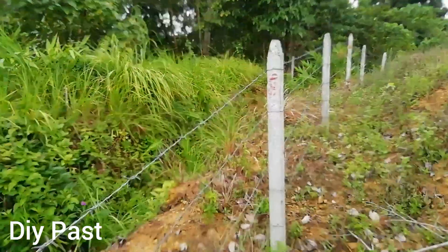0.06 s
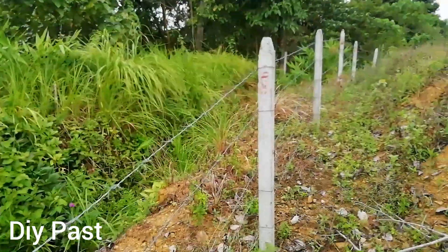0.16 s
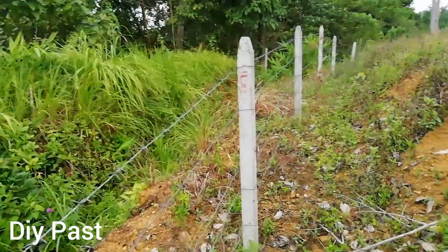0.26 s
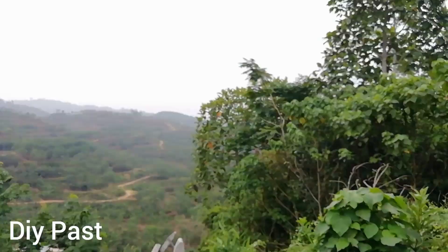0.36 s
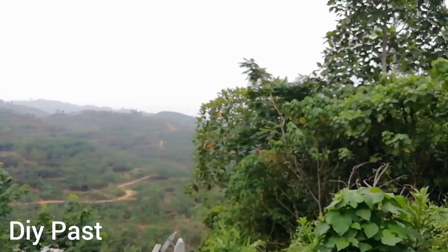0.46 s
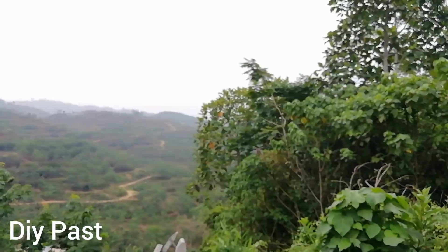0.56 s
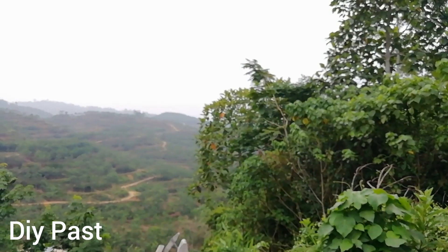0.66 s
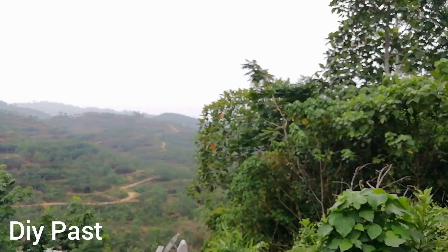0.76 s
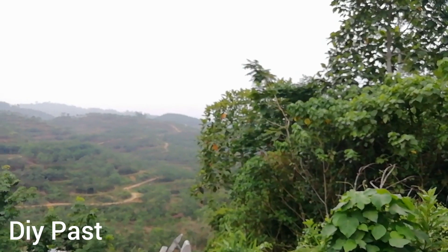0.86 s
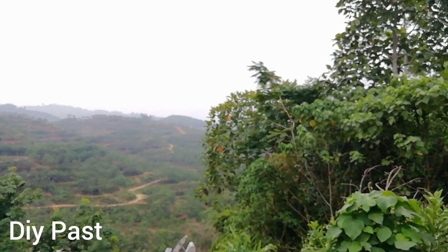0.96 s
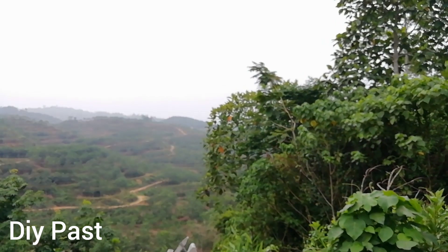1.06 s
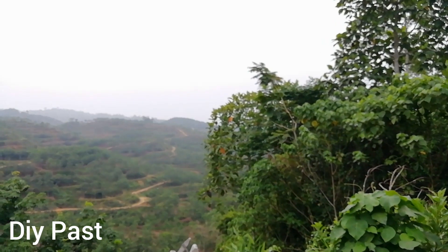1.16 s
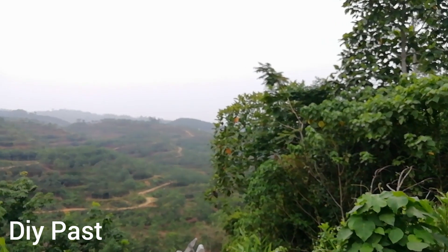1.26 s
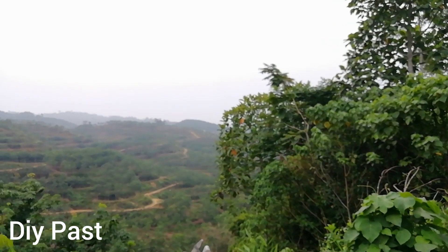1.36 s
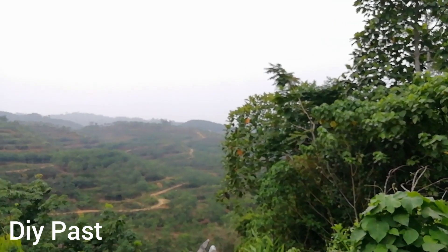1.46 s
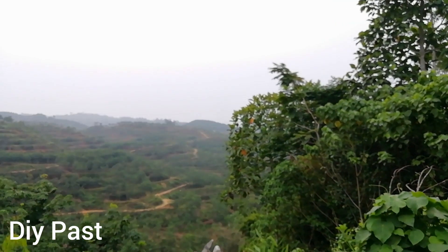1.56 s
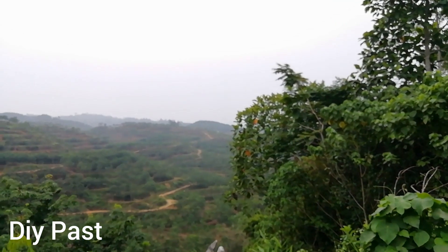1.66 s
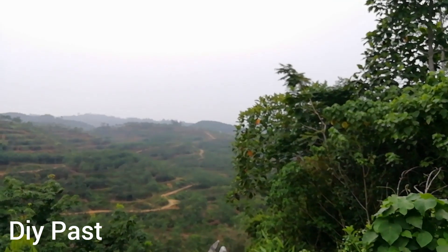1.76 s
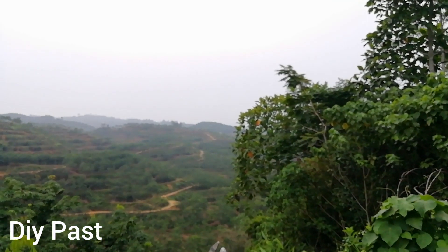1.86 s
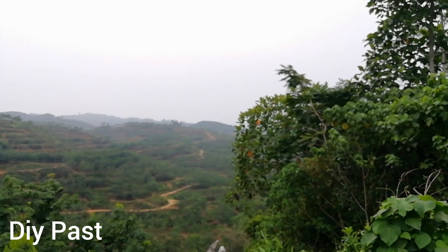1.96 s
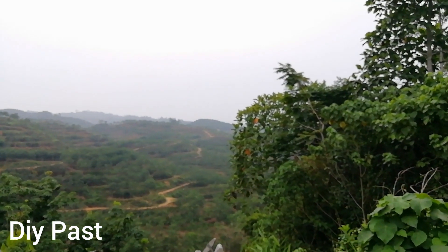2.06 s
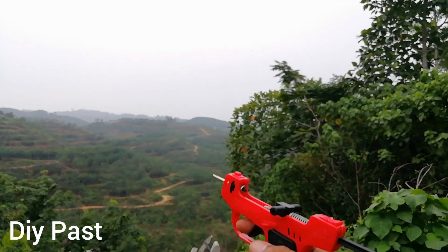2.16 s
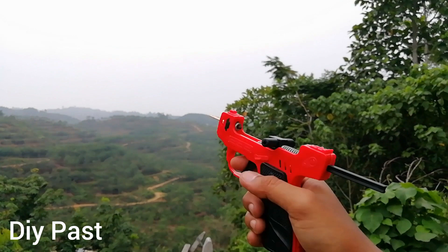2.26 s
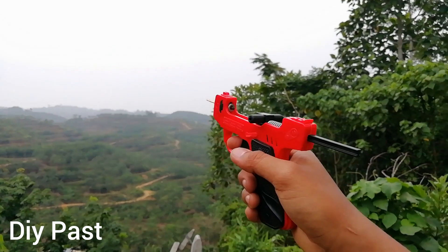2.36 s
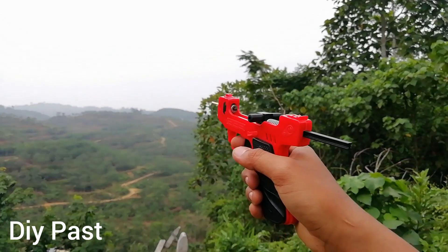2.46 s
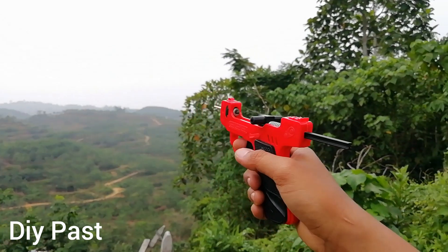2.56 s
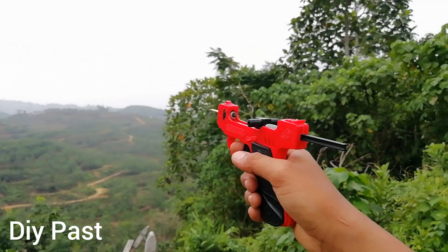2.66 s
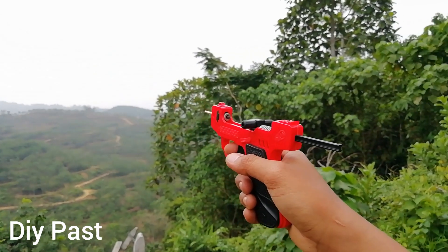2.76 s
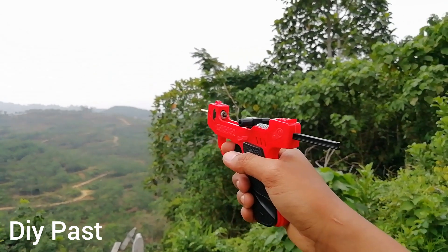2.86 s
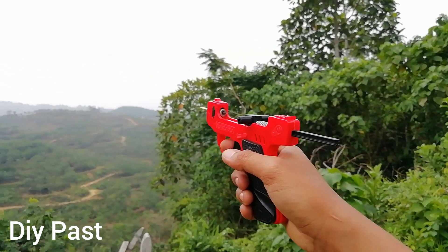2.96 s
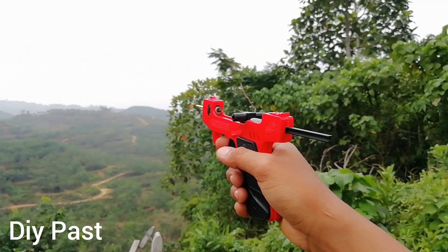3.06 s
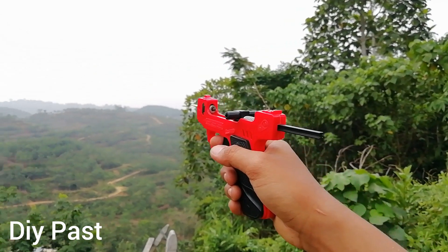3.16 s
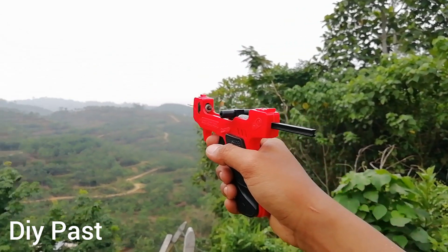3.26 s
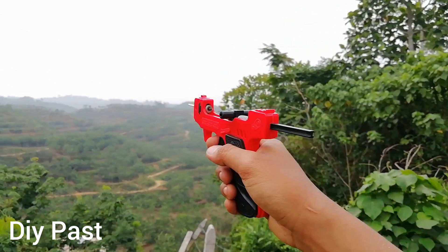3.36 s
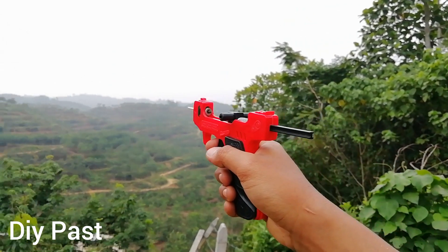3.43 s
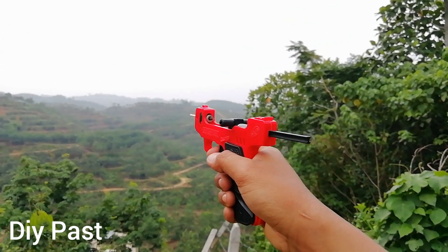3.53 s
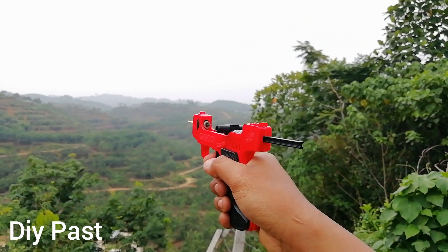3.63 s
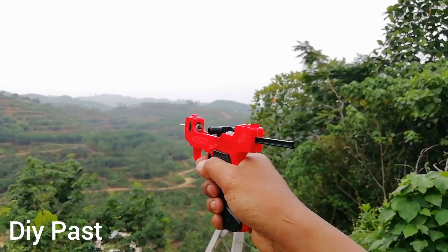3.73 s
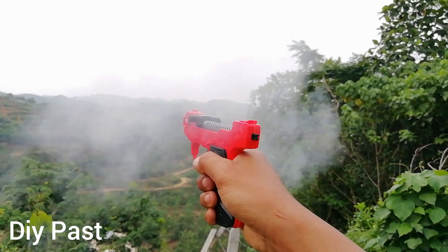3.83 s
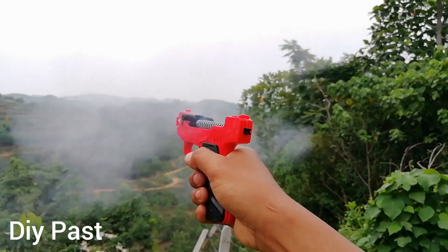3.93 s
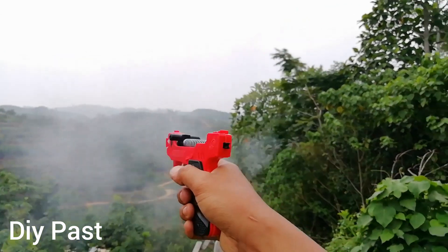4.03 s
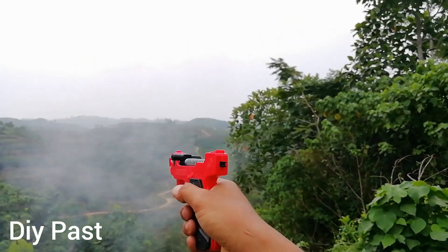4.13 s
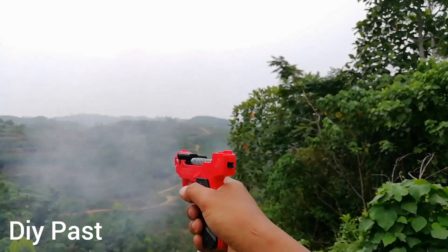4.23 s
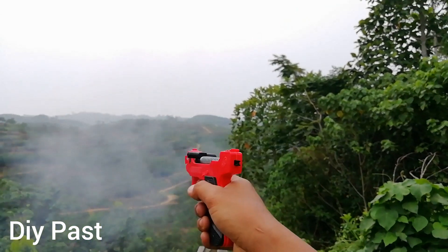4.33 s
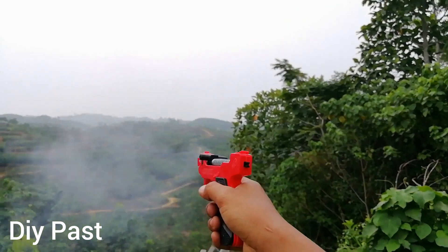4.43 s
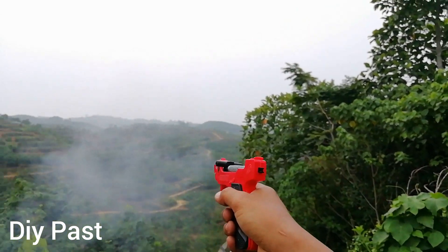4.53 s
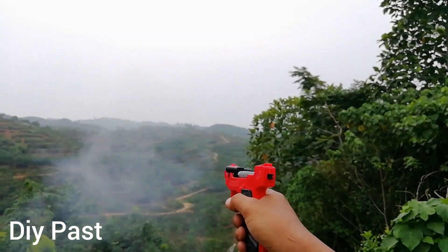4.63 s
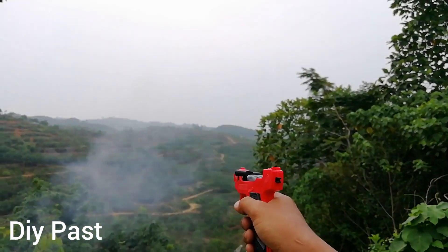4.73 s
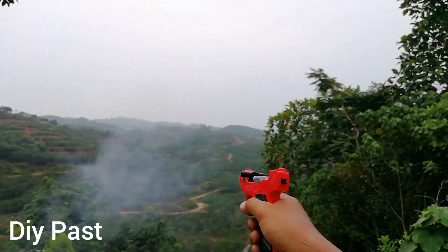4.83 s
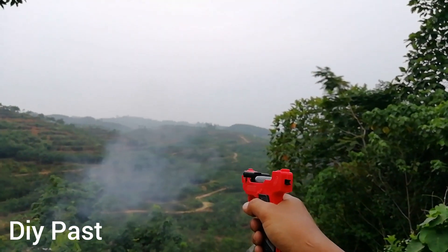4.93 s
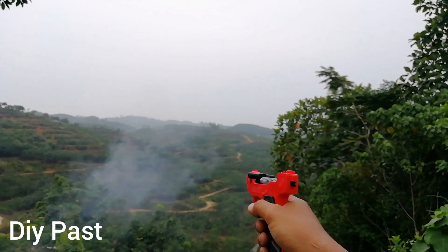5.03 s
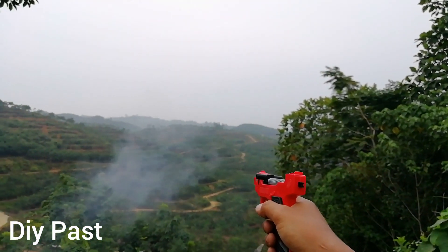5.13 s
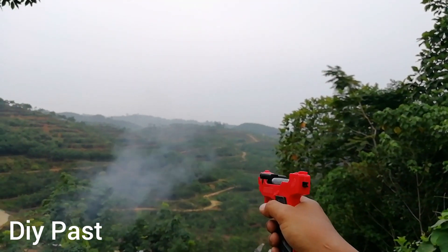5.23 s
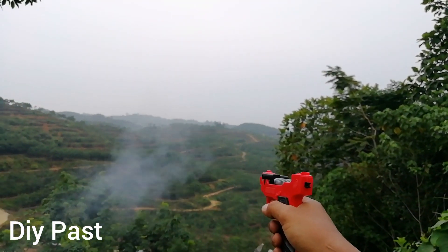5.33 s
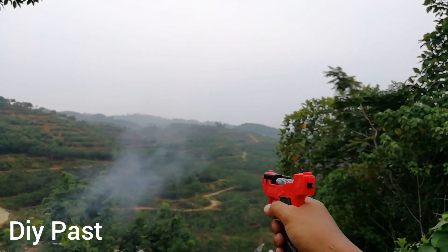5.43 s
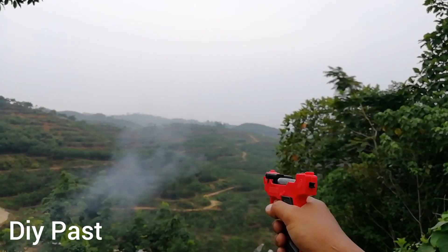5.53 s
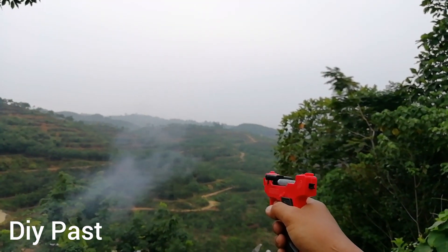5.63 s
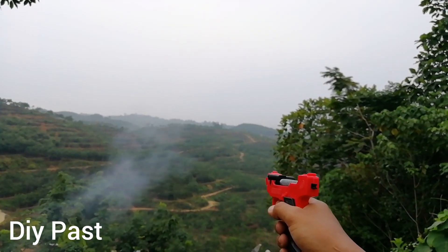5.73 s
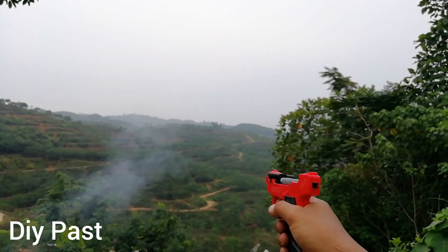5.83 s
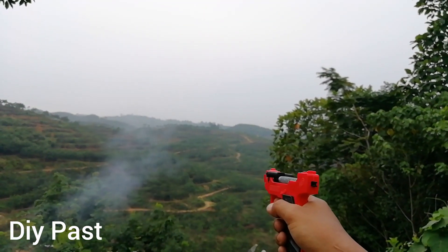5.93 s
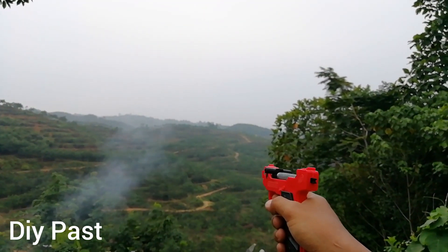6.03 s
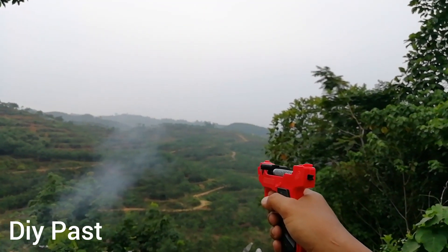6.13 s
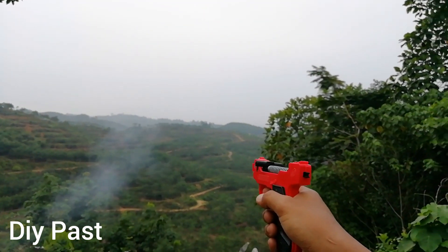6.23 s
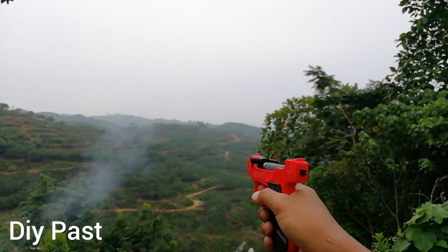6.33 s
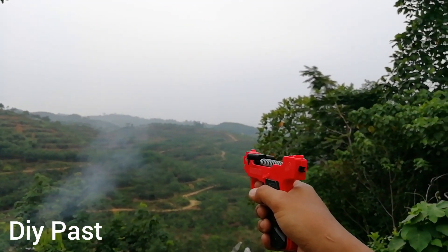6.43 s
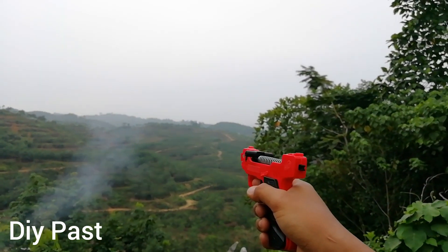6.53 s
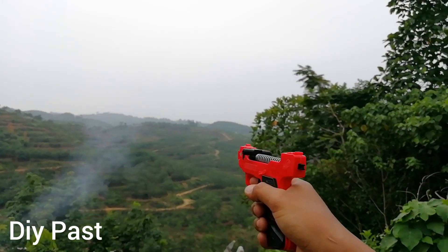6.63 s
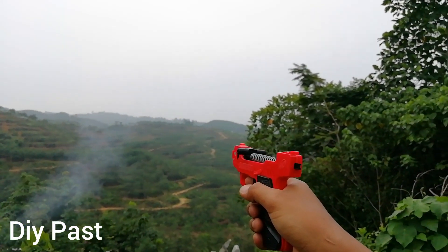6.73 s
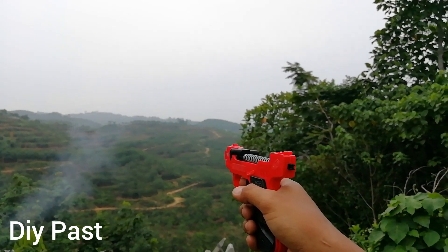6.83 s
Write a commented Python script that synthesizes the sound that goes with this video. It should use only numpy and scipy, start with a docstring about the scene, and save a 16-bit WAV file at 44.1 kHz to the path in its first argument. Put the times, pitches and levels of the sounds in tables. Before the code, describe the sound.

Quiet green hillside above a valley, heard from a handheld stereo microphone. First a short rustling step with snapping twigs, then a steady pulsed cicada, mostly to the right, with regular bird chips and sweet sliding whistles. A single hard crack from a small toy gun distorts the microphone, then scatters off trees and distant slopes with one faint slap. Afterwards come insects, sparse chips, a wind bump and clicks of plastic in the hand.

```python
"""A toy gun fires one match-head charge: a strike, ragged noise fronts and a low push clip the input.
Near trees, a bank, valley slopes and a ridge return the bang as shaped noise; one slap is distinct.
Before it a shoe treads dry grass, as noise grains, thuds and twig snaps, then a cut to a hillside where
a cicada is louder: pulsed tone and resonances. A second insect rasps, birds whistle gliding notes, wind
bumps the microphone as low noise, and a hand ticks on the plastic as damped resonances."""
import sys
import numpy as np
from scipy import signal
from scipy.fft import rfft, irfft, next_fast_len
from scipy.io import wavfile
from scipy.ndimage import uniform_filter1d

SR = 44100
rng = np.random.default_rng(int(sys.argv[2]) if len(sys.argv) > 2 else 0)


def unload_wav(signal):
    """Save mono or channel-first audio to the path in sys.argv[1] as 16-bit WAV at rate SR, clipped to [-1, 1]."""
    wavfile.write(
        sys.argv[1],
        SR,
        np.round(np.clip(np.atleast_2d(signal).T, -1, 1) * 32767).astype(np.int16),
    )


N = 303849
TIME = np.arange(N) / SR
CUT_S = 0.38  # cut from the step to the hillside, where the cicada is louder


def gain_of(db):
    """Decibels to amplitude."""
    return 10 ** (np.asarray(db) / 20)


def evened(x):
    """Scales to rms 1."""
    return x / np.sqrt(np.mean(x ** 2) + 1e-30)


def read(points, hz):
    """Reads a spectrum on a log-frequency axis."""
    f, value = np.transpose(points)
    return np.interp(np.log(hz + 1), np.log(f + 1), value)


def panned(db):
    """Left and right gains of constant power for a left-right difference."""
    pair = gain_of(np.array([np.atleast_1d(db), -np.atleast_1d(db)]) / 2)
    return pair / np.sqrt((pair ** 2).mean(0))


def add(mix, s, sound):
    """Mixes a sound in at a time."""
    start = max(round(s * SR), 0)
    part = mix[..., start:][..., :sound.shape[-1]]
    part += sound[..., :part.shape[-1]]


# likeness of the two ports: freq_hz, correlation [-1 to 1]
SAME = [(60, .93), (130, 0.61), (290, 0.26), (640, -0.6), (1400, 0.14), (15000, -0.078)]


def noise(colour):
    """Rms-1 noise of a given relative spectrum at two microphone ports, alike in the bass."""
    size = next_fast_len(N)
    hz = np.fft.rfftfreq(size, 1 / SR)
    a, b = rfft(rng.standard_normal((2, size)))
    same = read(SAME, hz)
    ports = np.array([a, same * a + np.sqrt(1 - same ** 2) * b])
    return evened(irfft(ports * gain_of(read(colour, hz)), size)[:, :N])


def resonate(x, hz, width_hz):
    """A steep resonance: a two-pole peak applied twice; width is that of one pass."""
    b, a = signal.iirpeak(hz, hz / width_hz, fs=SR)
    return signal.lfilter(b, a, signal.lfilter(b, a, x))


def band(hz, width_hz):
    """Noise in one resonance, unrelated at the two ports."""
    return evened(resonate(rng.standard_normal((2, N)), hz, width_hz))


def burst(t, decay_s, rise_s=.0002):
    """A sudden start that dies away exponentially."""
    t = np.maximum(t, 0)
    return (1 - np.exp(-t / rise_s)) * np.exp(-t / decay_s)


def swell(rows):
    """Smooth humps of amplitude; half_s is where the power has fallen to 1/e."""
    power = sum(gain_of(db) ** 2 * np.exp(-((TIME - s) / half_s) ** 2) for s, db, half_s in rows)
    return np.sqrt(power)


def drift(per_s):
    """A random wander of about unit size through per_s knots a second."""
    knots = np.arange(0, TIME[-1] + 1, 1 / per_s)
    return np.interp(TIME, knots, rng.standard_normal(len(knots)))


def clacks(rows, width_share=0.34, top_hz=7000):
    """Each snap or knock is a brief crack and one heavily damped resonance."""
    out, t = np.zeros((2, N)), np.arange(SR // 10) / SR
    lowpass = signal.butter(1, top_hz, fs=SR)
    for s, db, hz, decay_s, bright_db in rows:
        grit = rng.standard_normal((2, len(t)))
        shape = burst(t, decay_s)
        crack = evened(signal.lfilter(*lowpass, grit) * shape)
        body = evened(resonate(grit, hz, hz * width_share) * shape)
        level = gain_of(db) * np.sqrt(np.mean(shape ** 2))
        add(out, s, level * (body + gain_of(bright_db) * crack))
    return out


# still air spectrum: freq_hz, relative_db_per_hz
AIR = [(25, 1.5), (100, -8), (250, -14), (550, -18), (1400, -19), (2100, -22), (3000, -19.5), (4000, -21),
       (5000, -15.5), (5900, -24.5), (9200, -33.5), (10700, -19.5), (12300, -27.5), (14700, -21.5),
       (16000, -27)]


def air(level_db=-62.8):
    """The still air: steady coloured noise."""
    return gain_of(level_db) * noise(AIR)


# grass spectrum: freq_hz, relative_db_per_hz
GRASS = [(200, 8.5), (400, -0.5), (800, -3.5), (1300, -2), (2100, -5.5), (3100, -5), (5000, -4.5),
         (7600, -6.5), (15500, -15)]
# presses of the shoe: start_s, crunch_db, rise_s, decay_s, thud_db
TREADS = [(.055, -41.5, .002, .016, -37), (.092, -35, .01, .012, -34), (.187, -43.5, .02, .06, -41)]
# twigs snapping underfoot: start_s, level_db, pitch_hz, decay_s, brightness_db [re body]
TWIGS = [(.026, -42.5, 2960, .0025, 2), (.054, -29.5, 2980, .0017, -5.5), (.090, -24.5, 1750, .0015, -15),
         (.098, -25, 5300, .0011, -1), (.183, -40, 1500, .01, 3), (.204, -42.5, 1220, .0075, -20),
         (.2623, -42, 1060, .004, -15)]


def step(rustle_db=-54, grain_db=3, thud_hz=320, thud_decay_s=.01, thud_bright_db=-30, release_s=.2):
    """Each press of the shoe thuds; twigs snap, and dry stalks rub and break in tiny grains around it."""
    crunch_power = 0
    for s, db, rise_s, decay_s, _ in TREADS:
        distance = np.maximum((s - TIME) / rise_s, (TIME - s) / decay_s)
        crunch_power = crunch_power + gain_of(db) ** 2 * np.exp(-2 * distance)
    rustle = gain_of(rustle_db) * np.clip((CUT_S - TIME) / release_s, 0, 1)
    grains = gain_of(grain_db * evened(uniform_filter1d(rng.standard_normal(N), size=60)))
    stalks = evened(noise(GRASS) * grains) * np.sqrt(crunch_power + rustle ** 2)
    thuds = clacks([(s, db, thud_hz, thud_decay_s, thud_bright_db) for s, *_, db in TREADS])
    return thuds + clacks(TWIGS, width_share=.42) + stalks * (TIME < CUT_S)


# gusts on the microphone: middle_s, level_db, half_s [to 1/e power]
GUSTS = [(.125, -31.5, .028), (.14, -39.5, .14), (.339, -29.5, .006), (.374, -42, .01),
         (1.433, -33.5, .0093), (1.506, -30, .016), (1.97, -55.5, .045), (2.601, -49, .009),
         (2.8, -51, .14), (3.372, -56, .035), (3.795, -50.5, .027), (4.135, -40.5, .02), (4.27, -48.5, .12),
         (5.244, -27.5, .011), (5.307, -45, .034), (5.412, -43, .019), (6.3, -53, .17), (6.863, -44.5, .02)]
# wind spectrum: freq_hz, relative_db_per_hz
WIND = [(20, 0.5), (40, -0.5), (90, -1), (150, -14), (220, -19.5), (350, -32.5), (600, -52.5), (1300, -100)]


def wind(steady_db=-70, dull_hz=60, gentle_db=-56, strong_db=-36, lumps_db=4):
    """Eddies strike both ports together; gentle wind is deeper and lumpier in level."""
    level = np.hypot(gain_of(steady_db), swell(GUSTS))
    force = np.clip((20 * np.log10(level) - gentle_db) / (strong_db - gentle_db), .35, 1)
    eddies = noise(WIND)
    deep = evened(signal.sosfiltfilt(signal.butter(2, dull_hz, fs=SR, output="sos"), eddies))
    eddies = force * eddies + (1 - force) * deep
    lumps = gain_of(lumps_db * (1 - force) * drift(20))
    # running power evens out the noise, so the gust shapes set the level
    power = uniform_filter1d((eddies ** 2).mean(0), size=1100)
    return level * lumps * eddies / np.sqrt(power + .05)


# cicada resonances: centre_hz, width_hz [one pass], level_db [before effort], left_right_db, pulsed_share [0-1]
CICADA = [(7802, 260, -61.5, -19.5, .95), (7646, 430, -60, -16, 0.2), (6796, 590, -63, -8.5, .1)]


def cicada(pulse_hz=59.4, ring_s=0.0069, waver=0.0035, tone_hz=7860, tone_db=-62.6, tone_waver_hz=25,
           tone_sag_hz_per_s=9000, effort_db=.7, tiring_db_per_s=.22, unsteady_db=.6):
    """Each click of the tymbals rings the body: a tone that sags after each click, and a resonant rasp."""
    phase = np.cumsum(pulse_hz * (1 + waver * drift(20))) / SR
    age_s = phase % 1 / pulse_hz
    pulses = evened(burst(age_s, ring_s, rise_s=0.0022))
    pitch_hz = tone_hz + tone_waver_hz * drift(20) - tone_sag_hz_per_s * age_s
    tone = np.sin(2 * np.pi * np.cumsum(pitch_hz) / SR)
    out = gain_of(tone_db) * panned(-19) * evened(pulses * tone)
    for hz, width_hz, db, side_db, share in CICADA:
        drive = rng.standard_normal((2, N)) * (1 - share + share * pulses)
        out += gain_of(db) * panned(side_db) * evened(resonate(drive, hz, width_hz))
    effort = effort_db - tiring_db_per_s * TIME + unsteady_db * drift(10)
    cut = np.clip((TIME - CUT_S) / .01, .2, 1)  # a fifth of the amplitude before the cut
    return out * gain_of(effort) * cut


def whistle(length_s, from_hz, to_hz, db, middle, glide_s, fade_db=0, taper=.55):
    """A pure note that swells, slides from one pitch to another and fades."""
    t = np.arange(0, length_s, 1 / SR)
    hz = from_hz + (to_hz - from_hz) * (1 + np.tanh((t - middle * length_s) / glide_s)) / 2
    level = gain_of(db - fade_db * (t / length_s - .5)) * signal.windows.tukey(len(t), taper)
    return level * np.sqrt(2) * np.sin(2 * np.pi * np.cumsum(hz) / SR)


def woods(x, t60_s, wet_db):
    """Direct sound plus scatter from leaves and trunks, different at each port."""
    t = np.arange(SR // 2) / SR
    tail = rng.standard_normal((2, len(t))) * gain_of(-60 * t / t60_s)
    tail *= gain_of(wet_db) / np.linalg.norm(tail[0])
    wet = signal.fftconvolve(x[None], tail, axes=1)[:, :N]
    return (x + wet) / np.hypot(1, gain_of(wet_db))


# gliding notes: start_s, length_s, from_hz, to_hz, level_db, glide_middle [0-1], glide_s, fade_db
SONG = [(2.11, .09, 3000, 3020, -68, .5, .04, 0), (2.37, .22, 3100, 3400, -56.5, .3, .042, 2),
        (2.61, .26, 3100, 3410, -49.5, .5, .034, 6), (2.9, .25, 3500, 2000, -54, .38, .115, 23),
        (3.21, .21, 4320, 3480, -56.5, .3, .034, 6), (3.53, .27, 2540, 3300, -57.8, .45, .036, -4)]
# repeats of one falling chip: start_s, level_db
CHIPS = [(0.404, -65.5), (0.874, -63.5), (1.346, -62.5), (1.8, -62.5), (2.289, -63), (2.761, -62),
         (3.226, -63), (3.688, -62), (6.324, -69), (6.798, -64.5)]
# drop and upturn of a chip: delay_s, length_s, from_hz, to_hz, level_db [re chip], glide_middle [0-1], glide_s
CHIP = [(0, .037, 3650, 2450, 0, .57, .012), (.046, .028, 2620, 2780, -4, .5, .012)]
# thin slurs of a far bird: start_s, from_hz, to_hz, level_db
SLURS = [(.65, 3750, 4500, -74), (1.409, 4600, 4030, -69), (1.508, 3750, 4400, -70),
         (2.079, 4100, 3650, -71), (2.46, 3970, 4460, -70), (2.93, 3950, 4400, -69),
         (3.03, 3960, 4780, -70), (5.37, 3550, 3750, -67)]


def birds(slur_s=.05, slur_glide_s=.02):
    """A whistler deep in the trees on the right, a chipper nearer on the left, and far slurs."""
    song, chips, slurs = np.zeros((3, N))
    for s, *note in SONG:
        add(song, s, whistle(*note))
    for s, db in CHIPS:
        for delay_s, *note in CHIP:
            add(chips, s + delay_s, gain_of(db) * whistle(*note))
    for s, from_hz, to_hz, db in SLURS:
        add(slurs, s, whistle(slur_s, from_hz, to_hz, db, .5, slur_glide_s))
    whistler = panned(-3) * woods(song, t60_s=0.52, wet_db=13)
    chipper = panned(5) * woods(chips, t60_s=.4, wet_db=-1)
    return whistler + chipper + panned(4) * woods(slurs, t60_s=0.24, wet_db=5)


# phrases of a second insect: middle_s
RASPS_S = [.52, 1.15, 1.93, 2.75, 3.47, 4.42, 5.05, 5.63, 6.3, 6.85]


def rasper(hz=11250, width_hz=600, db=-73.5, half_s=.145):
    """A thin, high insect rasp: resonant noise that swells and rests."""
    return band(hz, width_hz) * swell([(s, db, half_s) for s in RASPS_S])


# hand on plastic: start_s, level_db, pitch_hz, decay_s, brightness_db [re body]
KNOCKS = [(1.074, -56.5, 3500, .0021, 4), (1.73, -55, 4370, .0018, 2), (5.03, -55, 9000, .0014, 10),
          (6.3625, -53, 2990, .0015, 6), (6.384, -48.5, 800, .0057, -24), (6.754, -60, 1900, .004, -9),
          (6.8375, -39, 2700, .0028, -21)]


def handling(bump_db=-10, bump_hz=320, bump_decay_s=.005, bump_bright_db=-28):
    """The plastic ticks in the hand, each time with a soft, low bump."""
    bumps = [(s, db + bump_db, bump_hz, bump_decay_s, bump_bright_db) for s, db, *_ in KNOCKS]
    return clacks(KNOCKS, width_share=.42) + clacks(bumps, width_share=.8)


# port colour for sound from the front: freq_hz, left_right_db
PORTS = [(200, 0.5), (330, -2), (750, 0), (1170, 1.5), (2740, 1.5), (5000, -2), (7000, -6), (8100, -18.5),
         (9000, -6.5), (10200, 0), (12000, 0), (13500, 8.5), (15000, 8)]


def from_front(x):
    """Colours each port for a source ahead of the microphone."""
    size = next_fast_len(N)
    hz = np.fft.rfftfreq(size, 1 / SR)
    return irfft(rfft(x, size) * panned(read(PORTS, hz)), size)[:, :N]


# pressure fronts of the shot: start_s, level_db, decay_s, left_right_db
FRONTS = [(3.843, -2, 0.0036, -7), (3.8503, -2, 0.011, -0.5), (3.8625, -7, .007, -3)]
# blast spectrum: freq_hz, relative_db_per_hz
BLAST = [(35, -26.5), (60, -10.5), (150, -8), (270, -14.5), (403, -7), (520, -13.5), (1400, -6),
         (2500, -11.5), (4200, -12.5), (5450, -11.5), (9080, -19), (12000, -16.5), (14800, -10.5),
         (16000, -20.5)]
STRIKE_S, STRIKE_DECAY_S = 3.8389, .0003


def shot(strike_db=3, push_db=-9, push_hz=95, push_s=3.8435, push_decay_s=.012, flare_db=-13):
    """The striker cracks, the charge flares and bursts in ragged fronts; its gas gives a slower push."""
    since_s = TIME - STRIKE_S
    strike = gain_of(strike_db) * panned(16) * band(SR / 3, SR / 5) * burst(since_s, STRIKE_DECAY_S)
    # the flare grows until the first front and ends at the second
    growth = np.clip(since_s / (FRONTS[0][0] - STRIKE_S), 0, 1) * (TIME < FRONTS[1][0])
    flare = gain_of(flare_db) * panned(2.3) * growth
    power = flare ** 2
    for s, db, decay_s, side_db in FRONTS:
        power = power + (gain_of(db) * panned(side_db) * burst(TIME - s, decay_s)) ** 2
    blast = from_front(noise(BLAST)) * np.sqrt(power)
    age_s = TIME - push_s
    push = gain_of(push_db) * burst(age_s, push_decay_s) * np.cos(2 * np.pi * push_hz * age_s)
    return strike + blast + push


def returned(first_s, last_s, db, sag_db_per_s, fall_db_per_s, build_s=.012):
    """Amplitude of the echo from one stretch of land: a build, a slow sag, then a fall."""
    age_s = np.maximum(TIME - first_s, 0)
    beyond = gain_of(np.clip(fall_db_per_s * (TIME - last_s), -200, 200))
    return np.minimum(age_s / build_s, 1) * gain_of(db - sag_db_per_s * age_s) / np.hypot(1, beyond)


def scatter(colour, loss_db_per_s, lumps_db, flutter_db):
    """Countless reflections; later ones have crossed more air and lost treble (loss is at 10100 Hz)."""
    hz, t, z = signal.stft(from_front(noise(colour)), SR, nperseg=512)
    absorbed_db = loss_db_per_s * hz[:, None] / 10100 * np.clip(t - 3.95, -.1, 3)
    lumps = uniform_filter1d(rng.standard_normal(z.shape), size=12, axis=1)
    lumps = evened(uniform_filter1d(lumps, size=4, axis=2))
    flutter = evened(uniform_filter1d(rng.standard_normal(N), size=100))  # single trunks stand out
    reflections = signal.istft(z * gain_of(lumps_db * lumps - absorbed_db), SR, nperseg=512)[1]
    return reflections[:, :N] * gain_of(flutter_db * flutter)


# tree echo spectrum: freq_hz, relative_db_per_hz
ECHO_COLOUR = [(80, -36), (130, -29.5), (270, -23.5), (400, -14.5), (560, -13.5), (800, -6), (1050, -6),
               (1640, -3), (2490, -5.5), (5750, -8.5), (8500, -11), (12300, -19), (14900, -16),
               (16000, -25)]
# near trees: first_return_s, last_return_s, level_db, sag_db_per_s, final_fall_db_per_s
TREES = (3.858, 4.045, -18.3, 7, 103)
# two valley slopes: first_return_s, last_return_s, level_db, sag_db_per_s, final_fall_db_per_s
VALLEY = [(3.98, 4.74, -45.3, 4, 38), (4.6, 5.43, -53.8, 3, 38)]
# valley echo spectrum: freq_hz, relative_db_per_hz
VALLEY_COLOUR = [(130, -15), (350, -8), (700, -3.5), (1100, -1.5), (1500, 0.5), (2200, -2.5), (3200, -6),
                 (5000, -9.8), (8000, -16), (16000, -28)]
# slap off the far slope: start_s, level_db, pitch_hz, decay_s, brightness_db [re body]
SLAP = (4.5035, -33, 1400, .0023, -22)
# bank below and far ridge, middle of the bang only: first_return_s, last_return_s, level_db,
# sag_db_per_s, final_fall_db_per_s, centre_hz, width_hz [one pass]
DULL_RETURNS = [(3.92, 4.08, -34.5, 8, 150, 1100, 800), (5.0, 6.4, -68, 3, 20, 1440, 600)]


def echoes(slope_build_s=.5, dull_build_s=.15):
    """The bang returns from near trees and bank, then the valley slopes, and last, faintly, the ridge."""
    trees = scatter(ECHO_COLOUR, loss_db_per_s=27, lumps_db=2.4, flutter_db=1) * returned(*TREES)
    slopes = np.sqrt(sum(returned(*slope, slope_build_s) ** 2 for slope in VALLEY))
    valley = scatter(VALLEY_COLOUR, loss_db_per_s=5, lumps_db=2.4, flutter_db=.7) * slopes
    dull = np.zeros((2, N))
    for *land, hz, width_hz in DULL_RETURNS:
        dull += band(hz, width_hz) * returned(*land, dull_build_s)
    return trees + valley + dull + clacks([SLAP], width_share=.6)


def scene():
    """All sources at the two ports."""
    nature = air() + wind() + cicada() + birds() + rasper()
    return nature + step() + handling() + shot() + echoes()


EDGE_HZ = 16100


def record(dry):
    """The input clips just below full scale; then a low-pass limits the band."""
    lowpass = signal.firwin(255, EDGE_HZ, window=("kaiser", 8), fs=SR)
    return signal.oaconvolve(np.clip(dry, -.95, .95), lowpass[None], "same")


dry = scene()
out = record(dry)
unload_wav(out)
```